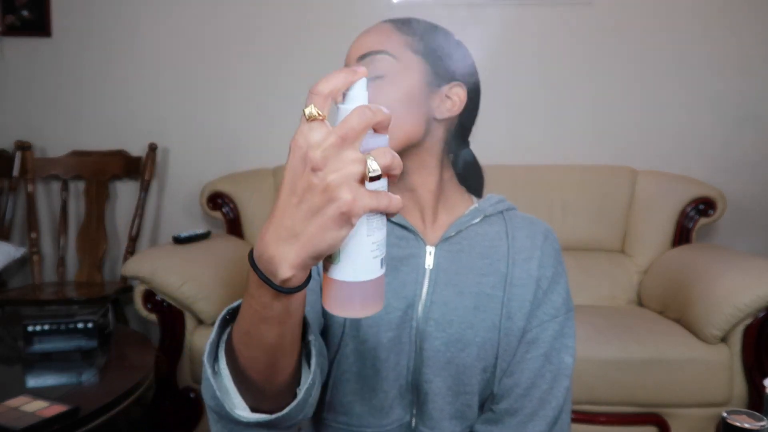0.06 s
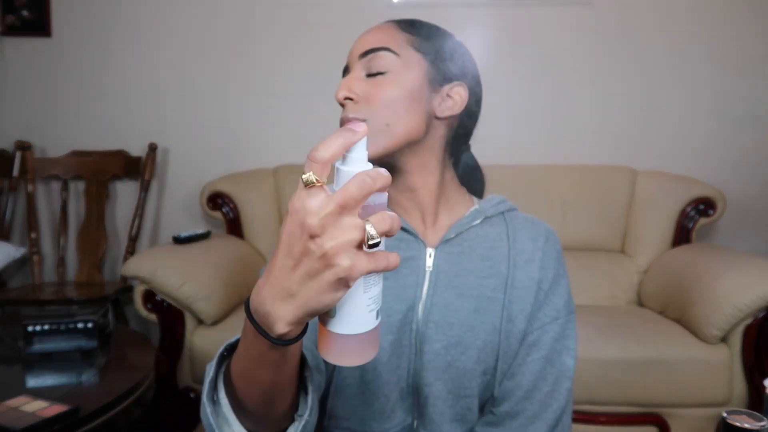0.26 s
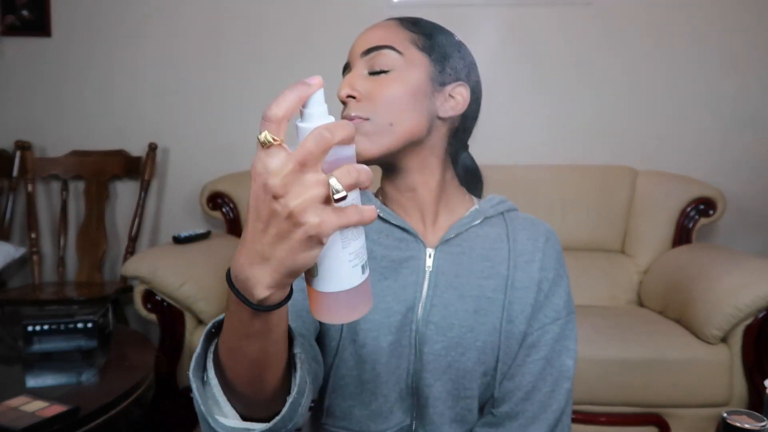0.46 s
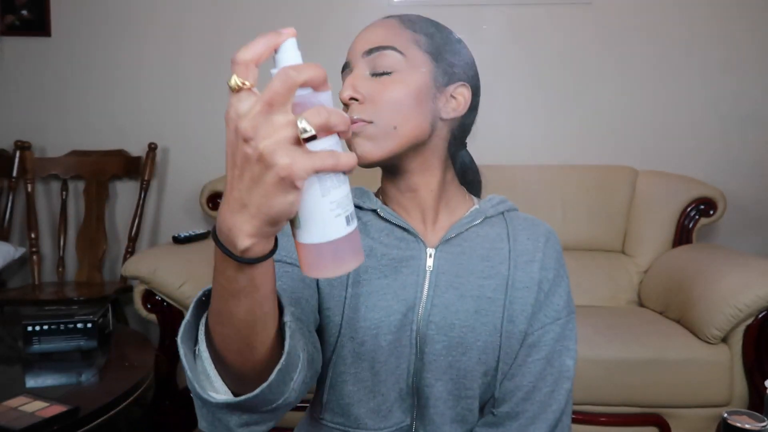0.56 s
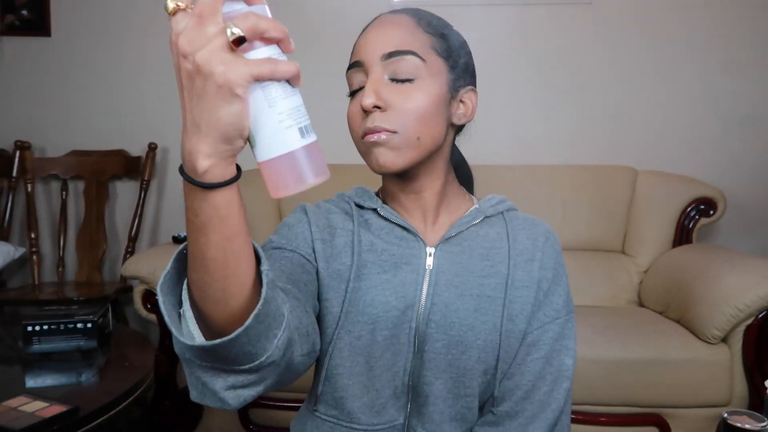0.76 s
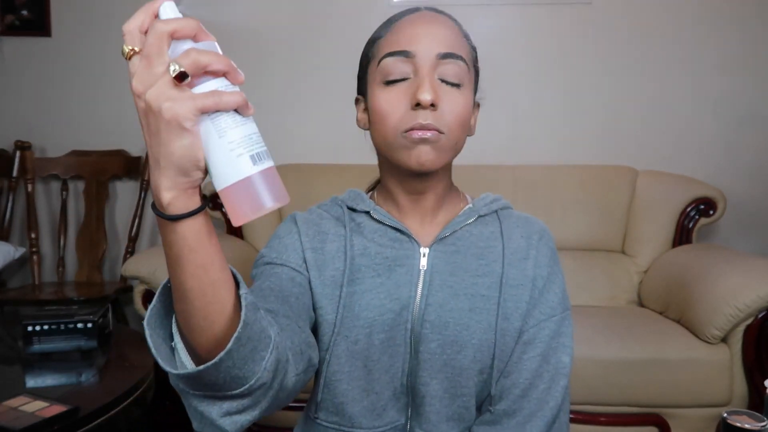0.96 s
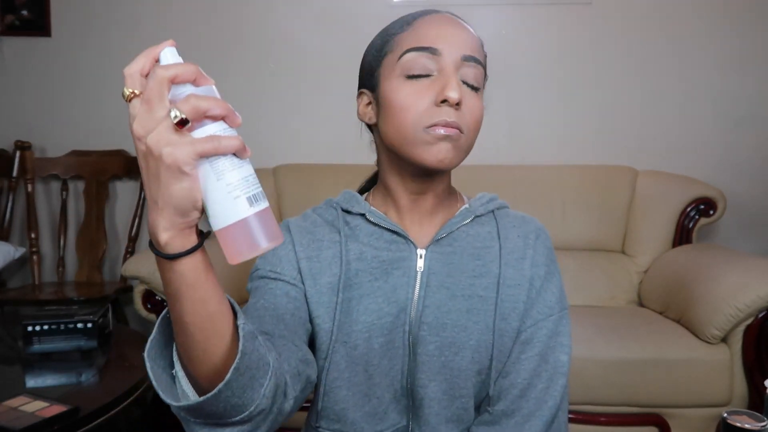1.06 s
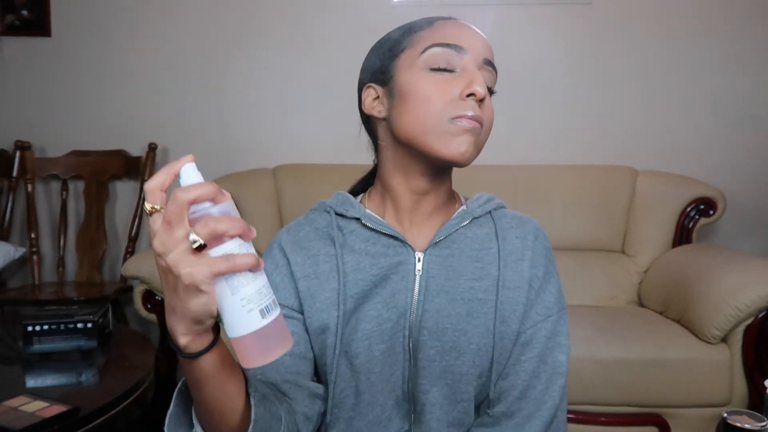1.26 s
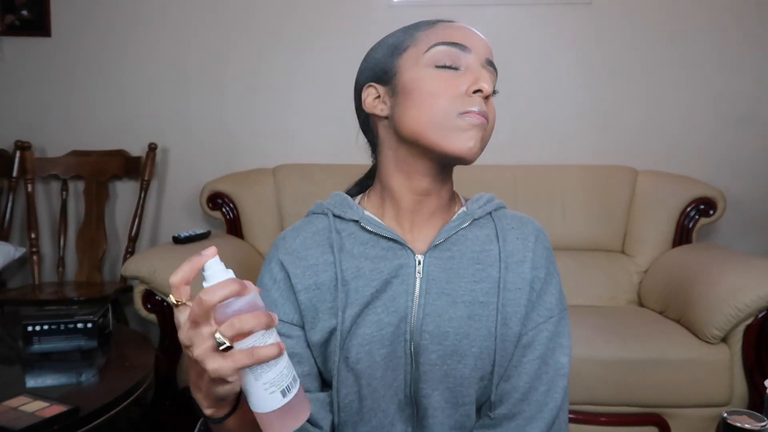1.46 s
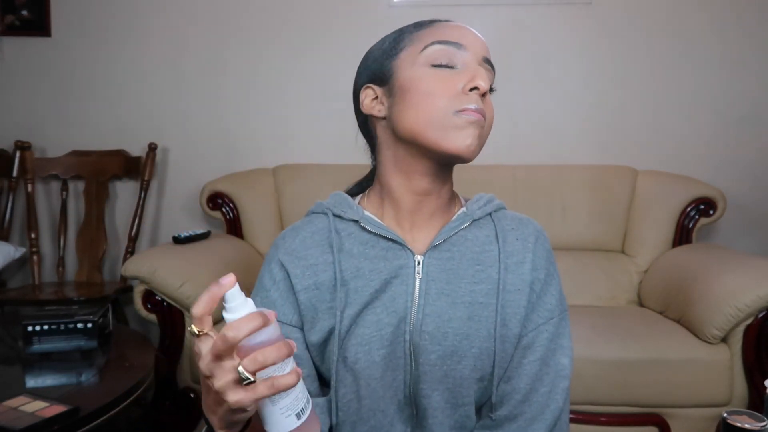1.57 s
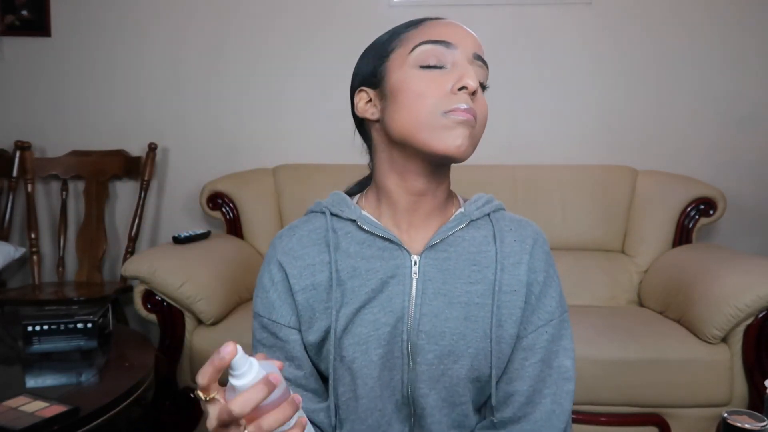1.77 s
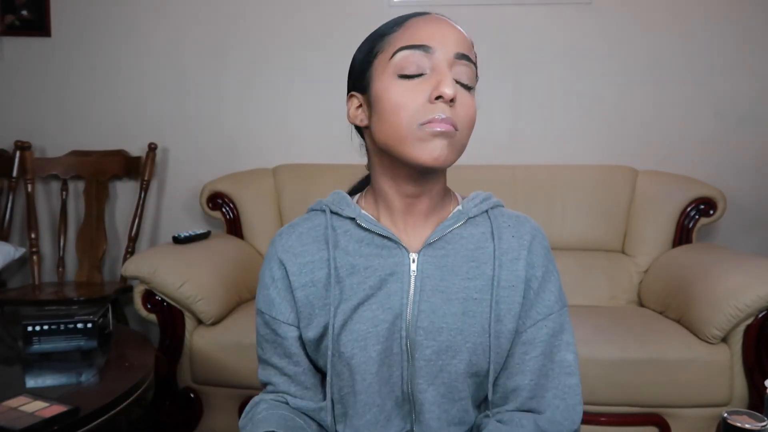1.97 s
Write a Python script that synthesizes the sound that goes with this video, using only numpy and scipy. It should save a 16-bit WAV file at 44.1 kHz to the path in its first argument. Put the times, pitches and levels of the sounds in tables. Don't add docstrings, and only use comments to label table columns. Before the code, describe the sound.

Seven rapid spray pumps: finger tap, hollow plastic click, brief airy hiss, spring tick; then faint rising bubble gurgles. Arm's-length stereo microphone, small soft room, low rumble, sleeve rustle and faint hum underneath.

```python
import sys
import numpy as np
from scipy import signal
from scipy.fft import rfft, irfft
from scipy.io import wavfile

SR = 44100
rng = np.random.default_rng(int(sys.argv[2]) if len(sys.argv) > 2 else 0)


def persist_wave(psi):
    counts = np.round(np.clip(psi, -1, 1) * 32767).astype(np.int16)
    wavfile.write(sys.argv[1], SR, np.atleast_2d(counts).T)


def gain_from_decibels(decibels):
    exponent = np.asarray(decibels, float) / 20
    return 10 ** exponent


N = 88200
LEAD = SR // 8
EDGES = 30 * 2 ** np.arange(0, 9.4, 1 / 3)

# start in seconds, pitch of the head in Hz.
SNAPS = [(.1327, 2190), (.3635, 2310), (.5910, 2290), (.8095, 2330), (1.0433, 2400), (1.2783, 2230),
         (1.5068, 2120)]
# peak in dB, partials in dB, time until choked in seconds,
# thud of the bottle in dB.
SNAP_FORCE = [
    (-16, 5.5, .0022, -47),
    (-12.5, -12, 0.0032, -40),
    (-13, 3, 0.0024, -43),
    (-16.5, 9, 0.0029, -44),
    (-12, 1, 0.0012, -53),
    (-17.5, -25, 0.0024, -44),
    (-20, 2, 0.0025, -46),
]
# frequency in Hz, likeness from -1 to 1.
LIKENESS = [(60, 0.73), (300, 0.31), (700, 0.36), (1500, 1), (3100, 1), (4500, 0.85), (6800, 0.4),
            (9000, 0.27), (15000, 0.46)]


def rms_one(x):
    return x / np.sqrt(np.mean(x ** 2) + 1e-20)


def at_hz(points, hz):
    table = np.array(points)
    return np.interp(np.log(hz), np.log(table[:, 0]), table[:, 1])


def drift(rate, size):
    r = np.exp(-16 * np.pi * rate / SR)
    slow = signal.lfilter([1], [1, -2 * r, r * r], rng.standard_normal(size // 8 + 1002))[1000:]
    return np.interp(np.arange(size) / 8, np.arange(len(slow)), rms_one(slow))


def ring(x, hz, t60):
    r, w = gain_from_decibels(-60 / (t60 * SR)), 2 * np.pi * hz / SR
    return signal.lfilter([0, np.sin(w)], [1, -2 * r * np.cos(w), r * r], x)


def bands(size, likeness, gain):
    out, white = 0, rng.standard_normal((2, 2, size))
    for k, (low, high) in enumerate(zip(EDGES, EDGES[1:])):
        band = signal.butter(2, [low, high], "band", fs=SR, output="sos")
        mid, side = signal.sosfilt(band, white[k % 2])
        hz = np.sqrt(low * high)
        alike = np.clip(likeness(hz), -1, 1)
        stereo = np.sqrt(1 + alike) * mid + np.sqrt(1 - alike) * side * [[1], [-1]]
        out = out + gain(hz) * stereo
    return out


def place(sound, s, size):
    return np.pad(sound, (int(s * SR) + LEAD, size))[:size]


def knock(db, modes, scuff_s, click, spread_db):
    t = np.arange(SR // 8) / SR
    scuff = rng.standard_normal(len(t)) * np.exp(-t / scuff_s) + click * (t == 0)
    sound = 0
    for hz, level_db, t60 in modes:
        strength, detune = rng.normal(0, 1, 2)
        tone = ring(ring(scuff, hz * (1 + 0.015 * detune), t60), hz, t60)
        sound = sound + gain_from_decibels(level_db + spread_db * strength) * tone / np.abs(tone).max()
    return gain_from_decibels(db) * sound / np.abs(sound).max()


def tilted(modes, upper_db):
    return [(hz, level_db + upper_db * (hz > 1800), t60) for hz, level_db, t60 in modes]


def air(size):
    # frequency in Hz, level in dB per Hz.
    air_spectrum = [(30, -37), (55, -5), (140, -4), (350, -2), (560, -9), (1400, -17), (2200, -18.5),
                    (15600, -47.5)]
    # frequency in Hz, likeness from -1 to 1.
    air_likeness = [(60, 1), (300, 0.91), (640, .75), (1400, 0.36), (3000, 0.12), (8000, 0.1), (15000, .2)]
    # frequency in Hz, spread in dB.
    air_wander = [(60, 3.5), (300, -1), (1000, 0.5)]
    # time in seconds, lift in dB.
    rustle = [(0, 2.5), (.4, 1.5), (.8, 2.5), (1.2, 1.5), (1.6, 0.3), (1.8, -1.5), (2, -3.5)]
    # frequency in Hz, share from 0 to 1.
    rustle_share = [(250, 0), (500, 1), (4000, 1), (8000, 0)]
    # frequency in Hz, width in Hz, level in dB.
    hum_tones = [(58.4, 25, -88.5), (120.5, 40, -97.5), (238.5, 3.5, -71.5), (368.6, 7.3, -74.5),
                 (12620, 90, -99)]
    # time in seconds, length in seconds, level in dB.
    rumbles = [(.255, .02, -64), (.336, .05, -65), (.419, .03, -64), (.53, .03, -66), (.82, .03, -67),
               (1.16, .06, -66), (1.29, .025, -67), (1.4, .03, -68)]
    t = (np.arange(size) - LEAD) / SR
    rustle_db = np.interp(t, *np.transpose(rustle))

    def gain(hz):
        wander_db = at_hz(air_wander, hz) * drift(15.0, size)
        return gain_from_decibels(at_hz(air_spectrum, hz) + at_hz(rustle_share, hz) * rustle_db + wander_db)
    floor = rms_one(bands(size, lambda hz: at_hz(air_likeness, hz), gain))
    hums = 0
    for hz, width, db in hum_tones:
        hums = hums + gain_from_decibels(db) * rms_one(ring(rng.standard_normal(size), hz, 2.2 / width))
    rumble_band = signal.butter(2, (45, 170), "band", fs=SR, output="sos")
    low = rms_one(signal.sosfilt(rumble_band, rng.standard_normal(size)))
    swell = sum(gain_from_decibels(db) * np.exp(-((t - s) / length) ** 2) for s, length, db in rumbles)
    return gain_from_decibels(-65.5) * floor + hums + low * swell


def jets(size):
    # start in seconds, end in seconds,
    # level in dB, rise in seconds, fine hiss in dB.
    puffs = [(-.06, -0.01, -40.5, 0.0069, 2), (0.161, 0.168, -67, 0.004, 2.5),
             (.165, 0.188, -37.5, 0.0081, 1), (.368, 0.38, -55, 0.0038, 11), (0.386, 0.42, -37, 0.012, 0.7),
             (0.432, 0.455, -55, 0.0022, -0.5), (0.583, 0.624, -64.5, 0.0067, -1),
             (0.612, 0.64, -33.5, 0.019, -0.5), (0.807, 0.836, -41, 0.0034, -6),
             (0.827, 0.86, -35.5, 0.014, 1.5), (1.044, 1.065, -38, 0.00089, -8.5),
             (1.063, 1.095, -36, 0.0061, -1), (1.117, 1.126, -38.5, 0.0031, -2),
             (1.279, 1.289, -59.5, 0.0013, -7), (1.302, 1.327, -37.5, 0.0051, 0.5),
             (1.355, 1.364, -50.5, .003, -4), (1.542, 1.562, -37.5, 0.0083, -0.5)]
    # frequency in Hz, level in dB per Hz.
    mist = [(410, -57.5), (700, -25.5), (2080, 0.5), (3370, -1), (5440, -9.5), (7430, -17.5), (13500, -23),
            (15600, -19)]
    # frequency in Hz, time to fall 60 dB in seconds.
    stop_t60 = [(2000, 0.0049), (12000, 0.059)]
    # frequency in Hz, share from 0 to 1.
    fine_share = [(4000, 0), (9000, 1)]
    sputter_db, patch_db = 1.2, 1.5
    t = (np.arange(size) - LEAD) / SR
    coarse, fine = 0, 0
    for start, end, db, rise, fine_db in puffs:
        valve = gain_from_decibels(db) * np.clip((t - start) / rise, 0, 1) * (t < end)
        coarse = coarse + valve
        fine = fine + gain_from_decibels(fine_db) * valve
    sputter = np.clip(drift(300, size), -2, 1)
    scale = np.sqrt(np.mean(gain_from_decibels(2 * at_hz(mist, np.arange(20, SR / 2)))))

    def gain(hz):
        fall, share = 60 / at_hz(stop_t60, hz) * t, at_hz(fine_share, hz)
        open_db = 20 * np.log10((1 - share) * coarse + share * fine + 1e-9)
        flow_db = np.maximum.accumulate(open_db + fall) - fall
        patch = np.clip(drift(200, size), -2, 1)
        return gain_from_decibels(flow_db + at_hz(mist, hz) + sputter_db * sputter + patch_db * patch) / scale
    return bands(size, lambda hz: at_hz(LIKENESS, hz), gain)


def spring_returns(size):
    # start in seconds, peak in dB, upper rings against lower in dB.
    ticks = [
        (0.08, -37, -1.5),
        (.303, -33.5, 3.5),
        (0.53, -35.5, -8),
        (.743, -34.5, -5.5),
        (.975, -43.5, -7.5),
        (1.211, -47.5, -5.5),
        (1.455, -41, 0),
        (1.666, -39.5, -9),
    ]
    # frequency in Hz, level in dB, time to fall 60 dB in seconds.
    modes = [(730, -10, .011), (1430, 0, .0085), (2150, 0, .009), (5100, -24, .006)]
    return sum(place(knock(db, tilted(modes, upper_db), .001, 10, spread_db=1), s, size)
               for s, db, upper_db in ticks)


def bubbles(size):
    # start in seconds, peak in dB,
    # frequency in Hz, length in seconds.
    gurgle = [(0.094, -60.5, 3230, .003), (0.306, -64.5, 5000, 0.013), (0.529, -64.5, 4950, .009),
              (.55, -68, 4460, .004), (0.549, -65, 3030, 0.0023), (0.543, -58, 2050, 0.0031),
              (0.761, -56.5, 3120, 0.0026), (0.763, -68, 4400, .002), (0.787, -60, 4950, 0.0049),
              (0.981, -75, 5150, 0.016), (.996, -69, 3340, .003), (.997, -55, 2150, .003),
              (1.17, -59, 5330, 0.013), (1.186, -63, 4900, 0.024), (1.226, -69, 4750, 0.031),
              (1.687, -54, 2040, 0.0028), (1.701, -60, 2250, .005), (1.713, -64, 2450, 0.0036),
              (1.721, -60, 2700, 0.0023), (1.729, -51.5, 2740, 0.0033), (1.745, -58, 2650, .003),
              (1.768, -58.5, 2770, 0.0022), (1.778, -67.5, 2930, .008), (1.821, -73, 3300, 0.0035),
              (1.771, -66, 1800, 0.0065), (1.73, -63, 986, 0.0053), (1.827, -60, 4380, .004),
              (1.826, -64.5, 4105, .001), (1.827, -77.5, 4980, .002), (1.829, -66.5, 3730, 0.016),
              (1.852, -73.5, 3900, 0.008), (1.869, -72, 3650, .012), (1.931, -81.5, 4110, 0.034)]
    return sum(place(knock(db, [(hz, 0, .008)], length, 3, spread_db=0), s, size)
               for s, db, hz, length in gurgle)


def finger_touches(size):
    # start in seconds, peak in dB, upper rings against lower in dB.
    landings = [
        (0.1251, -34, 4),
        (0.3556, -26.5, 10),
        (.5828, -28, -6),
        (0.801, -35.5, -6.5),
        (1.0373, -37.5, -1),
        (1.2701, -40, -5),
        (1.4985, -32.5, -5.5),
    ]
    # frequency in Hz, level in dB, time to fall 60 dB in seconds.
    modes = [(1400, 0, .005), (2150, 0, .007), (4800, -22, .005), (795, -12, .008)]
    return sum(place(knock(db, tilted(modes, upper_db), .001, 8, spread_db=1), s, size)
               for s, db, upper_db in landings)


def blow(db, pitch_hz, partials_db, choke_s, rise_s):
    # multiple of the pitch, level in dB, time until choked in seconds.
    partials = [(.55, -20, .0015), (1.45, -19, .0009), (1.75, -15, .0009), (2.03, -14, .001),
                (2.3, -18, .0009)]
    t = np.arange(SR // 50) / SR
    upper = 0
    for i, (multiple, level_db, end) in enumerate(partials):
        strength, detune = rng.normal(0, 1, 2)
        tone = np.sin(2 * np.pi * multiple * (1 + .02 * detune) * pitch_hz * t)
        upper = upper + (-1) ** i * gain_from_decibels(level_db + strength) * np.exp(-(t / end) ** 2) * tone
    main = np.exp(-(t / choke_s) ** 3) * np.sin(2 * np.pi * pitch_hz * t)
    return gain_from_decibels(db) * (main + gain_from_decibels(partials_db) * upper) * np.clip(t / rise_s, 0, 1)


def snaps(size):
    # start in seconds, peak in dB, time until choked in seconds.
    rebounds = [(.1362, -25, .0036), (.1408, -26, .002), (.1508, -33, .0015), (.3688, -21, .0025),
                (.3728, -25, .0022), (.382, -33, .002), (.5948, -27, .0035), (.5992, -28, .0027),
                (.6095, -36, .0015), (.8148, -30, .002), (1.0485, -27, .0015), (1.2828, -30, .002),
                (1.2862, -29, .0012), (1.5123, -31, .0048), (1.535, -40, .002)]
    # frequency in Hz, level in dB per Hz.
    rattle = [(400, -26), (1000, -9), (1600, -4), (2250, 0), (3000, -3), (4200, -8), (5400, -9),
              (6200, -50)]
    rattle_db, rattle_t60_s, rattle_rise_s = -15.5, 0.06, 0.00043
    out, t = np.zeros(size), np.arange(SR // 8) / SR
    chatter = bands(size, lambda hz: 1, lambda hz: gain_from_decibels(at_hz(rattle, hz) + 3 * drift(300, size)))
    loose = rms_one(chatter[0])
    for (s, pitch_hz), (db, partials_db, choke_s, _) in zip(SNAPS, SNAP_FORCE):
        rise = np.clip(t / rattle_rise_s, 0, 1) ** 2
        shake = gain_from_decibels(db + rattle_db - 60 * t / rattle_t60_s) * rise
        out = out + loose * place(shake, s, size)
        out = out + place(blow(db, pitch_hz, partials_db, choke_s, .0001), s + .0004, size)
    for s, db, choke_s in rebounds:
        pitch_hz = [hz for start, hz in SNAPS if start < s][-1]
        out = out + place(blow(db, pitch_hz, -1.0, choke_s, 0.00085), s, size)
    return out


def thuds(size):
    # frequency in Hz, level in dB, time to fall 60 dB in seconds.
    modes = [(330, -5, .025), (520, 0, .02), (780, 0, .014)]
    return sum(place(knock(thud_db, modes, .004, 4, spread_db=3), s, size)
               for (s, _), (_, _, _, thud_db) in zip(SNAPS, SNAP_FORCE))


def room(x):
    # frequency in Hz, time to fall 60 dB in seconds.
    room_t60 = [(500, 0.21), (2500, 0.17), (6000, 0.13), (13000, 0.13)]
    delay_s = 0.0028
    t = np.arange(SR // 3) / SR
    onset = np.clip(t / delay_s - 1, 0, 1)
    tail = bands(len(t), lambda hz: 0.69 * at_hz(LIKENESS, hz),
                 lambda hz: gain_from_decibels(-60 * t / at_hz(room_t60, hz)) * onset)
    tail = tail / np.sqrt(np.sum(tail ** 2, axis=1, keepdims=True))
    return gain_from_decibels(-13) * signal.fftconvolve(x, tail, axes=1)[:, :x.shape[1]]


def scene():
    # time in seconds, left minus right in dB.
    bottle_pan = [(0, -.4), (.6, -.2), (.9, .5), (1.5, 1.1), (2, 0)]
    size = N + LEAD
    pan_db = np.interp((np.arange(size) - LEAD) / SR, *np.transpose(bottle_pan))
    thin = signal.sosfilt(signal.butter(2, 1200, "high", fs=SR, output="sos"), snaps(size))
    contacts = spring_returns(size) + bubbles(size) + finger_touches(size) + thin + thuds(size)
    contact_band = signal.cheby1(8, 1, (220, 5650), "band", fs=SR, output="sos")
    contacts = signal.sosfilt(contact_band, contacts)
    bottle = (contacts + jets(size)) * gain_from_decibels(pan_db * [[.5], [-.5]])
    return (bottle + room(bottle) + air(size))[:, LEAD:]


def roll_off(x):
    return signal.sosfilt(signal.butter(12, 15830, fs=SR, output="sos"), x)


def record(dry):
    # frequency in Hz, phase in radians.
    port_phase = [(2500, 0), (5500, .6), (7000, 1.9), (11000, 2.6), (14000, 1.4)]
    turn = np.exp(.5j * at_hz(port_phase, np.linspace(1, SR / 2, N // 2 + 1)) * [[1], [-1]])
    ports = irfft(rfft(dry) * turn, N)
    low_cut = signal.butter(2, 42, "high", fs=SR, output="sos")
    high_cut = signal.cheby2(10, 60, 15700 * 1.04, fs=SR, output="sos")
    return roll_off(signal.sosfilt(np.vstack([low_cut, high_cut]), ports))


dry = scene()
out = record(dry)
persist_wave(out)
```